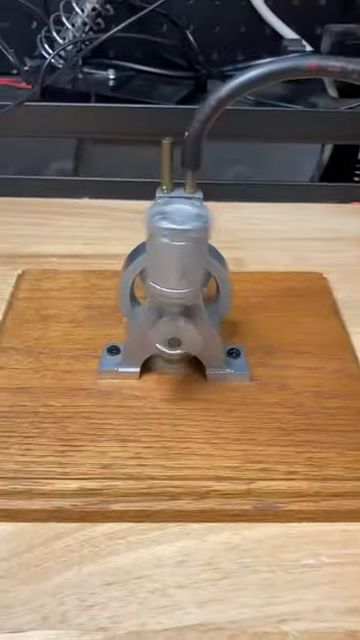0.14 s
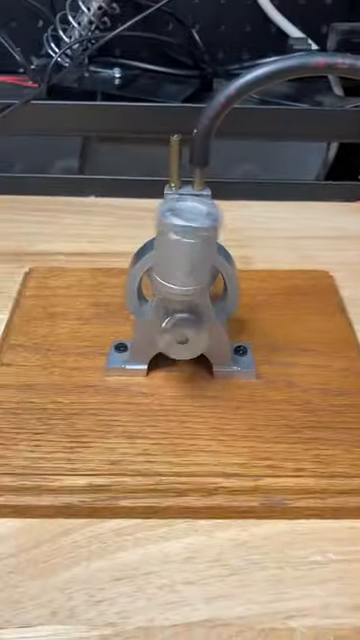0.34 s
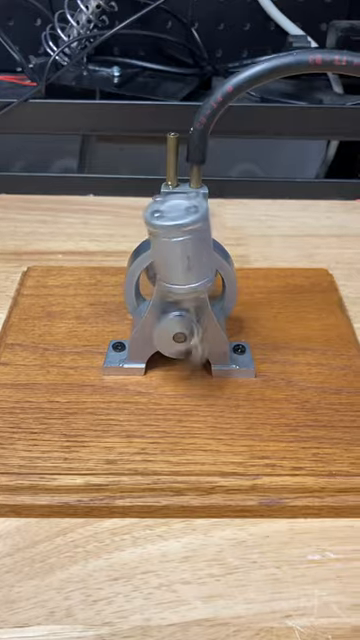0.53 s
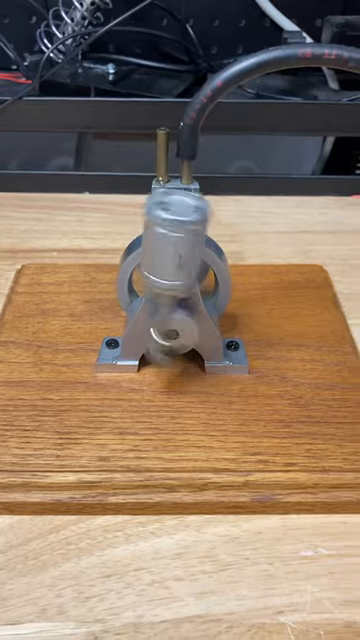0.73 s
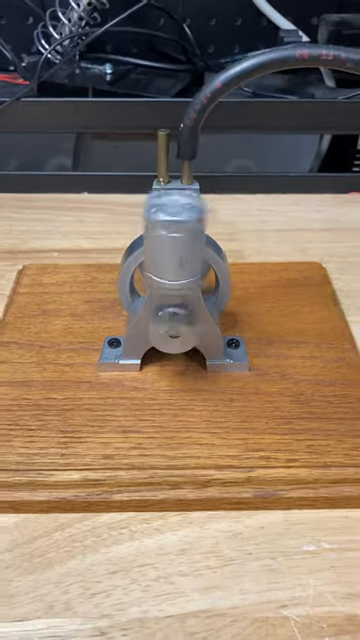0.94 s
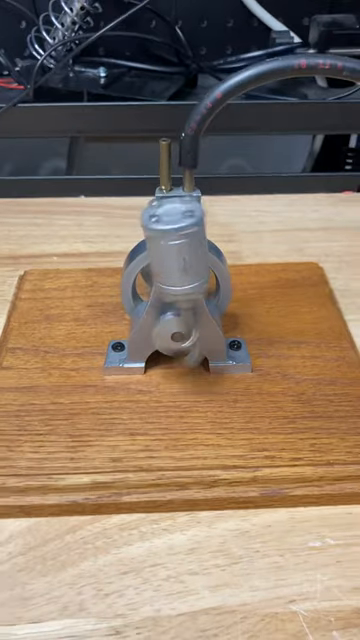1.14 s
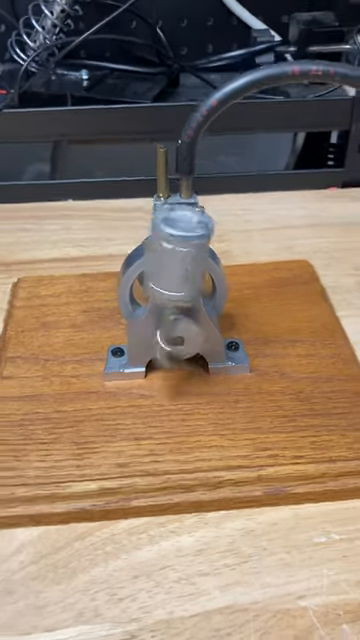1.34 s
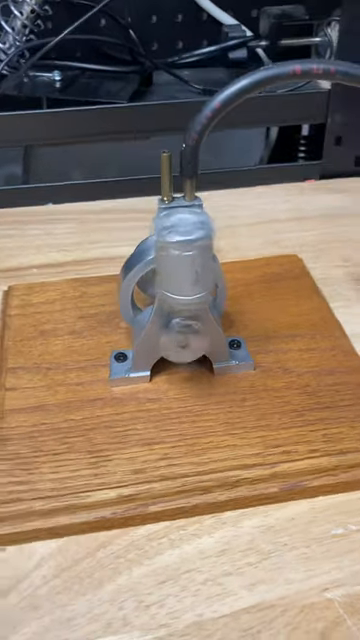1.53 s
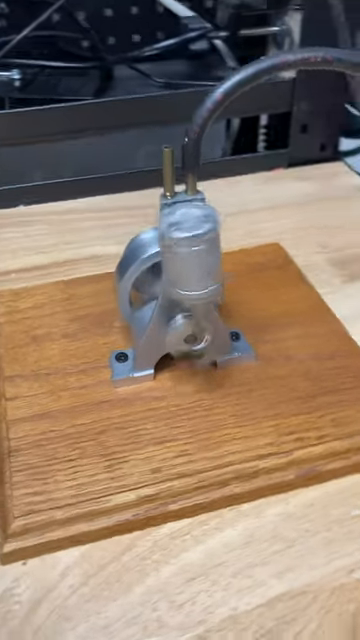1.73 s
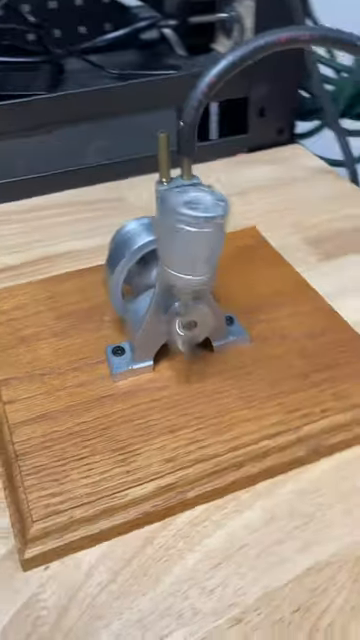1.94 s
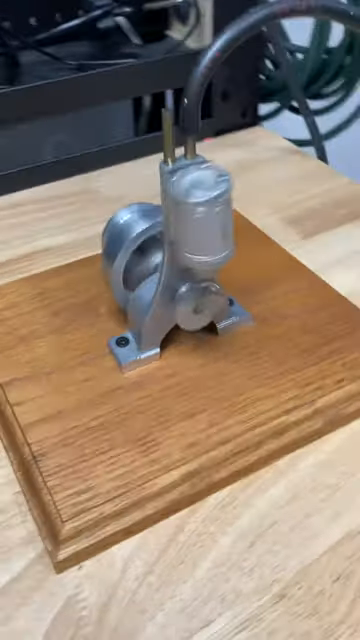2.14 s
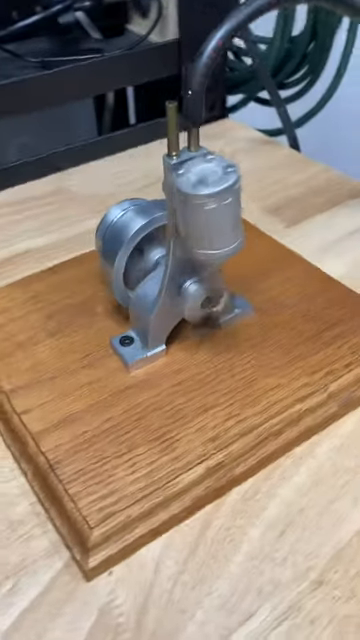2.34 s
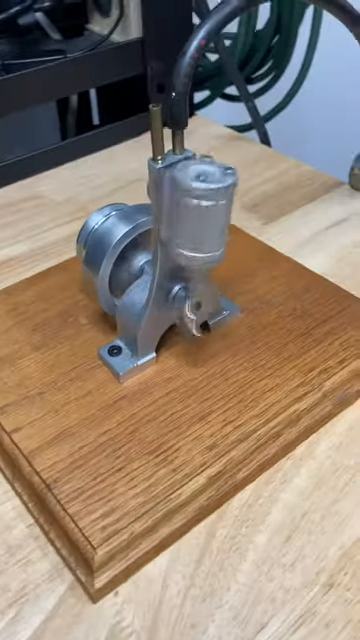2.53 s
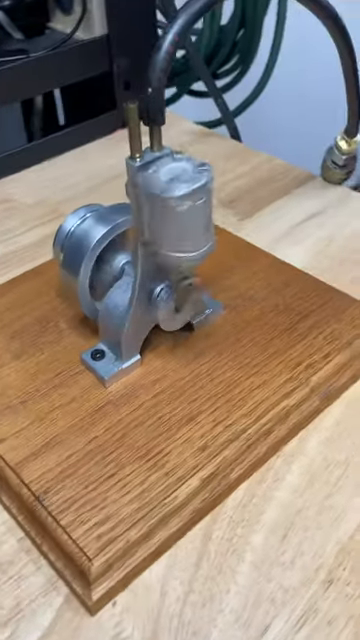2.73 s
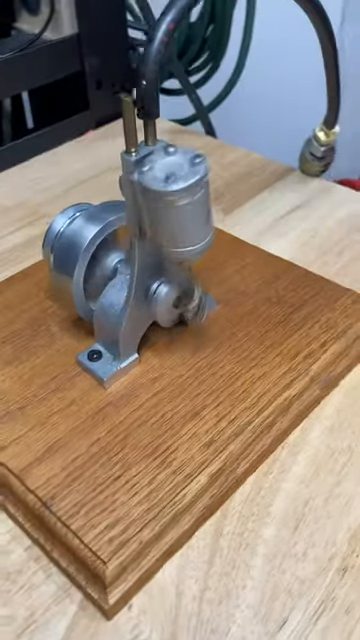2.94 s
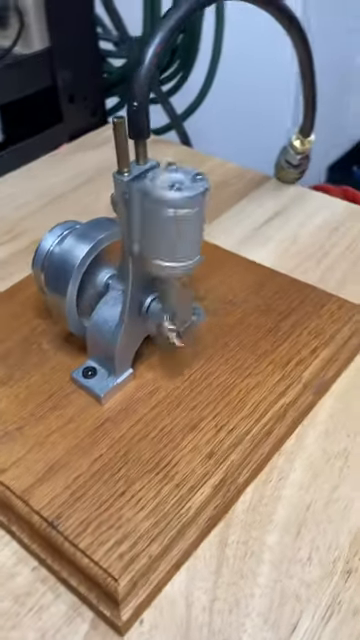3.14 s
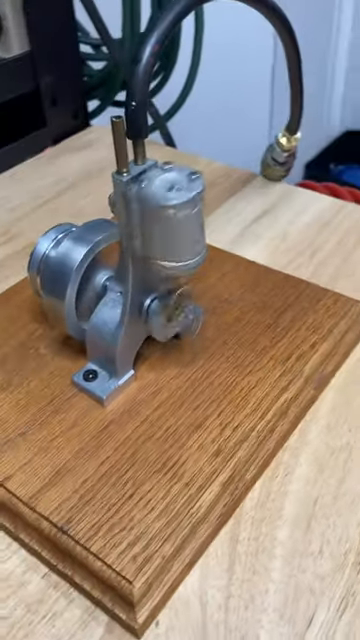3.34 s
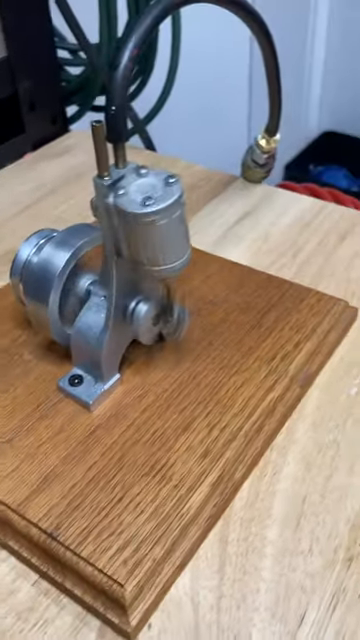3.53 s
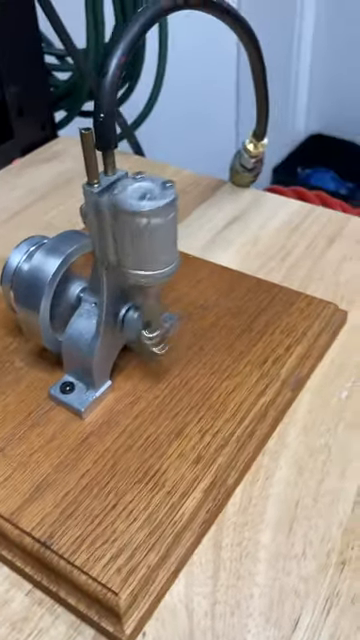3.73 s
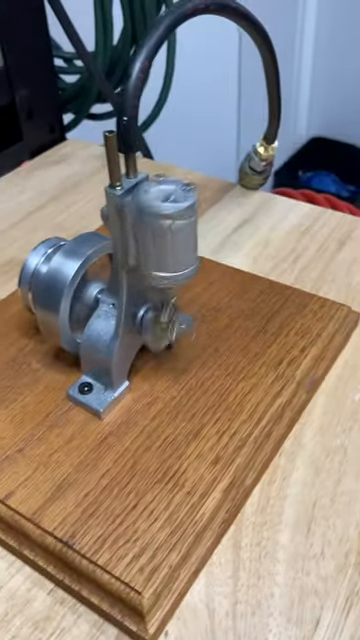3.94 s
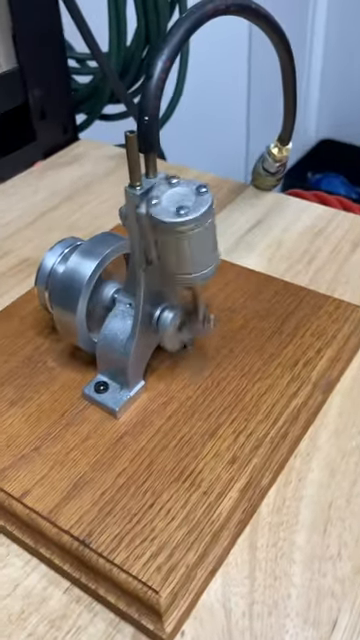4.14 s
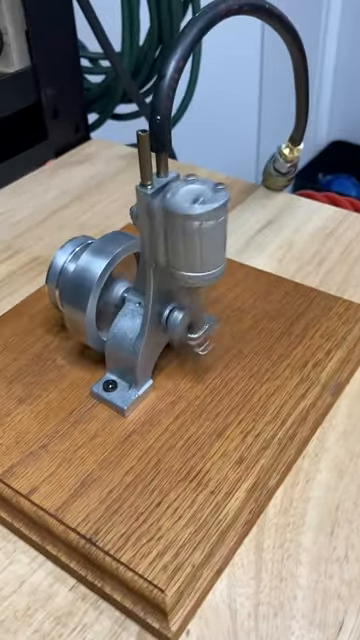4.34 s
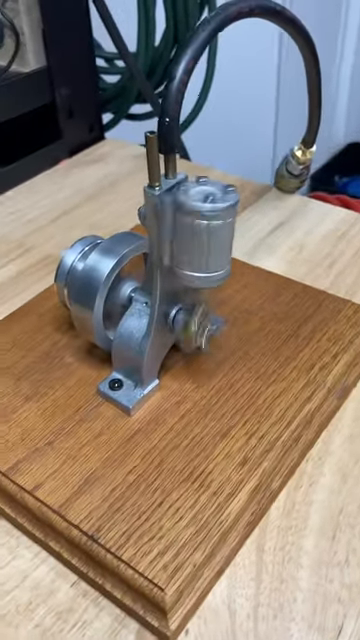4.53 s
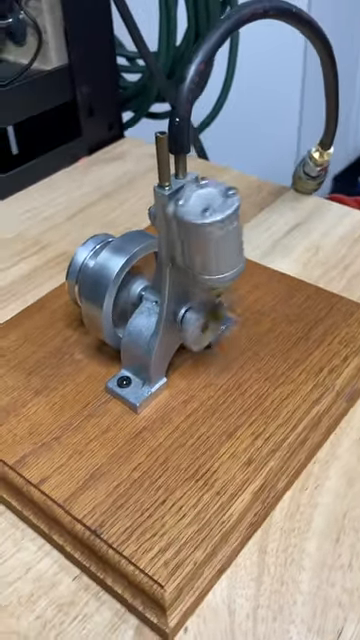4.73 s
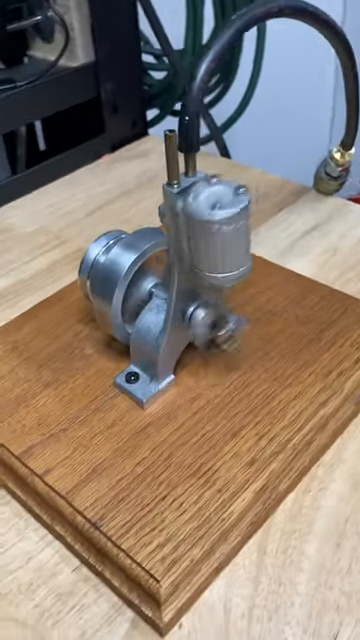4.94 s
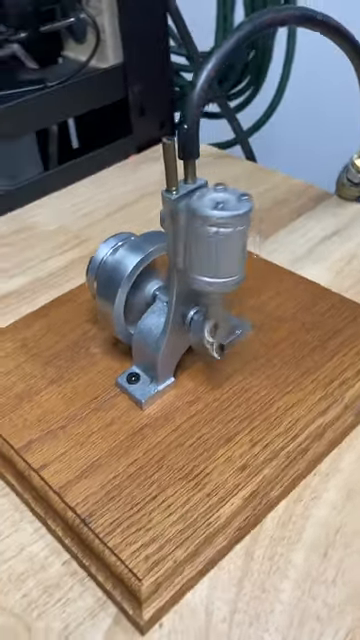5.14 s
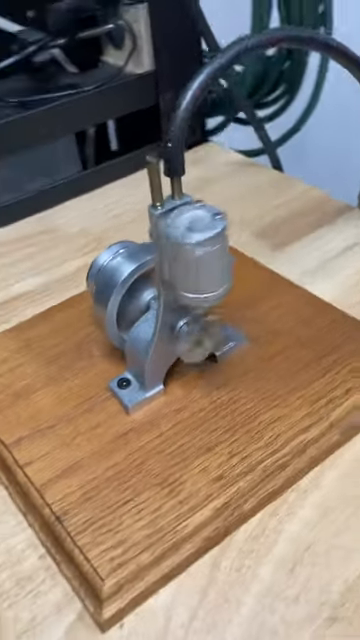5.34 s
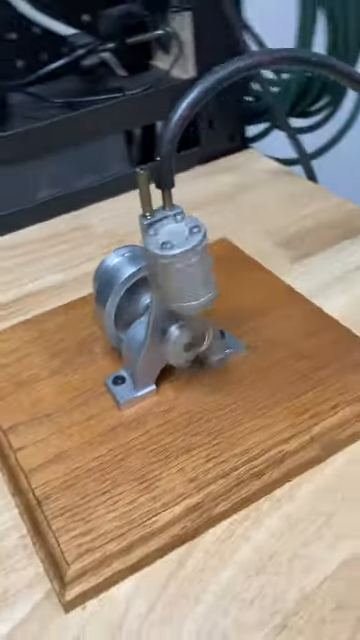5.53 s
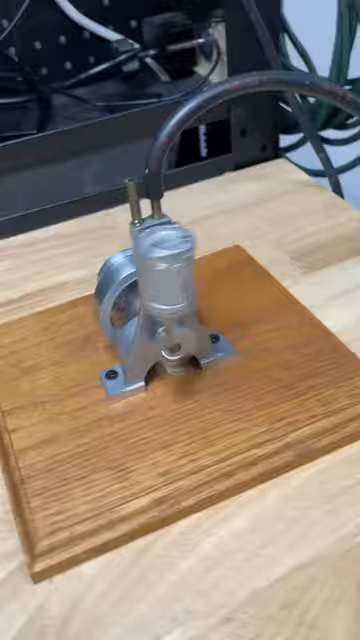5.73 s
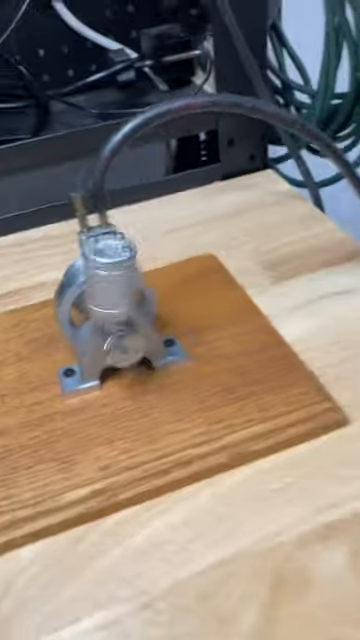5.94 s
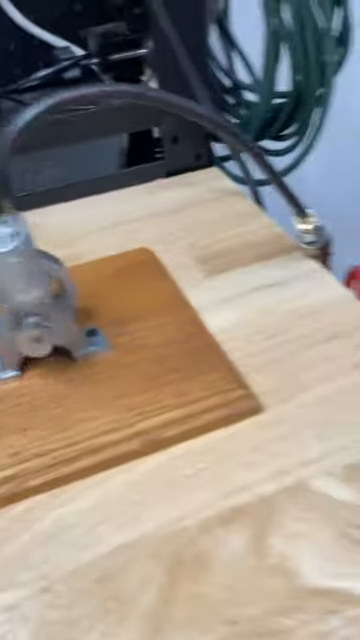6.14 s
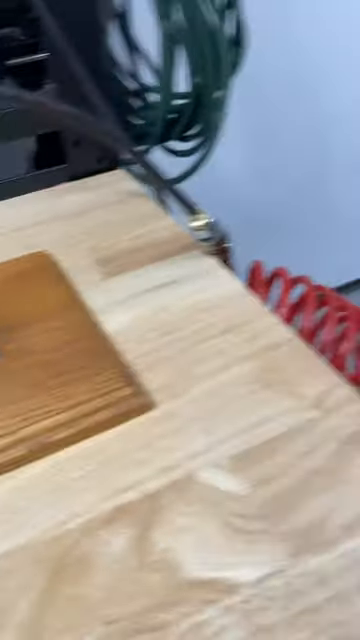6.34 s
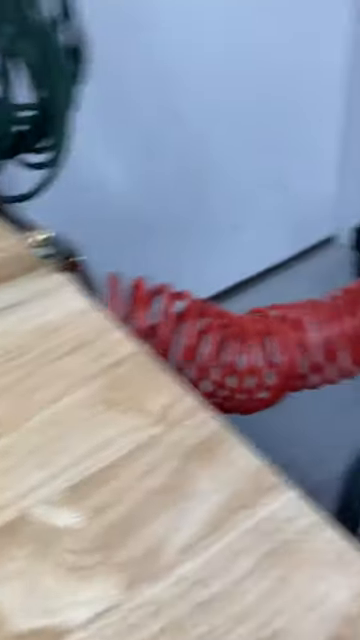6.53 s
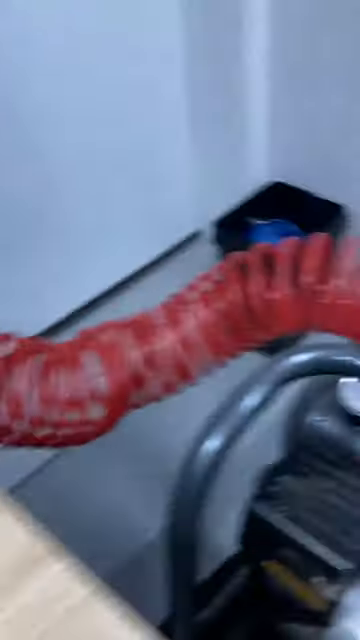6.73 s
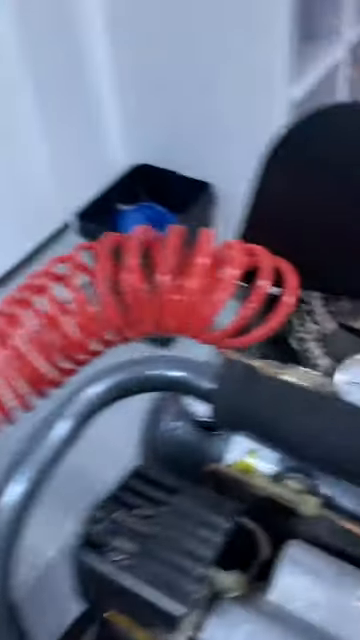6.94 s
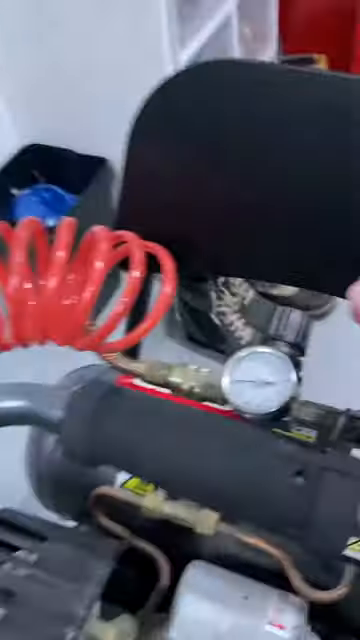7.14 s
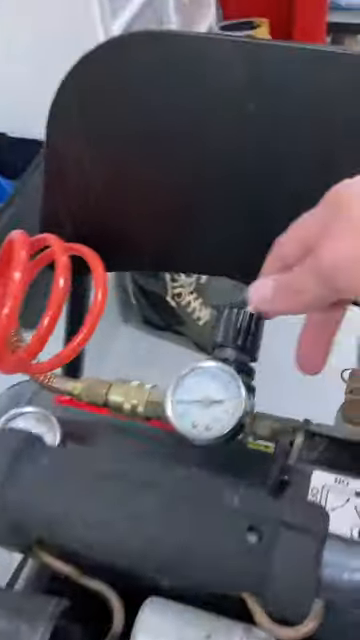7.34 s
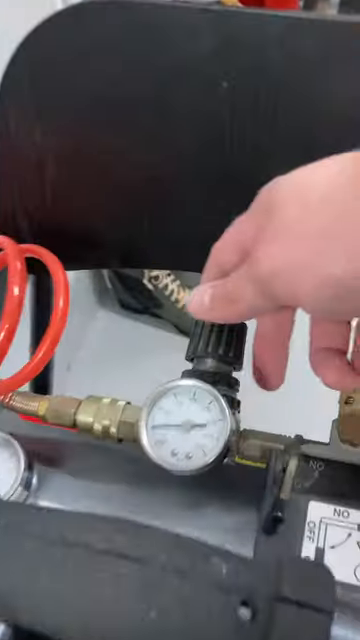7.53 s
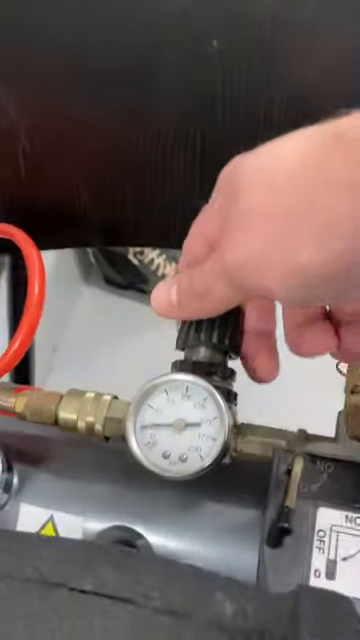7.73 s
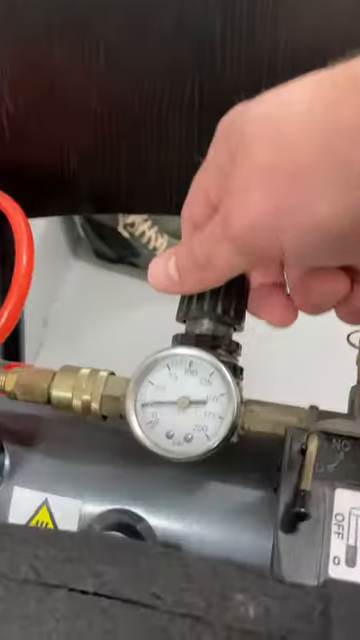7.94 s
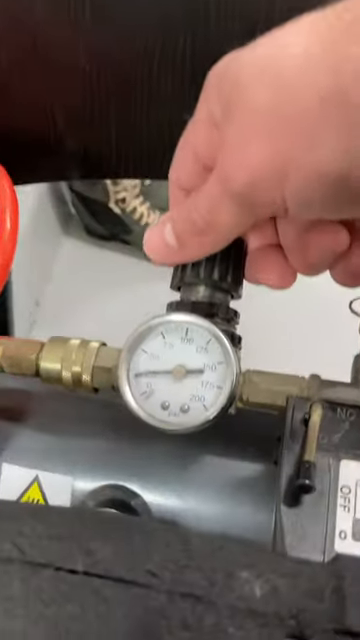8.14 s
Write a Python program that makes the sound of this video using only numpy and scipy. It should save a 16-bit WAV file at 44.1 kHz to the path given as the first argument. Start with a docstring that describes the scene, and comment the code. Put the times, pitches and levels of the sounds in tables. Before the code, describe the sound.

Rapid bright air puffs with metallic ticks blur into a raspy buzz above a faint wooden hum, fading sharply as the listener turns away.

```python
"""Workshop, a wooden board on a bench: a small oscillating-cylinder engine is already running on compressed air.
From the front come two exhaust chuffs a turn, as bursts of jet noise with metal ticks, over steady leaking air.
Crank and piston knocks ring board and bench as decaying modes, with a hum at multiples of the turning speed.
From 1.5 s the hand-held camera with its two microphone ports moves round to the side; from 5 s it leaves.
By 6.9 s it has turned away to the air tank: air and chuffs are weaker and the room weighs more."""
import sys
import numpy as np
from scipy import signal
from scipy.fft import rfft, irfft
from scipy.io import wavfile
from scipy.ndimage import uniform_filter1d

SR = 44100
rng = np.random.default_rng(int(sys.argv[2]) if len(sys.argv) > 2 else 0)


def to_wav(sig):
    """Store sig (one row per channel, or 1-D mono) as 16-bit WAV at the path in sys.argv[1].

    Samples outside -1..1 are clipped; the rate is SR.
    """
    pcm = np.clip(np.atleast_2d(sig), -1, 1) * 32767
    pcm = np.round(pcm).astype(np.int16)
    wavfile.write(sys.argv[1], SR, pcm.T)  # frames by channels


N = 360297
TIME = np.arange(N) / SR  # s
HZ = np.fft.rfftfreq(N, 1 / SR)


def gain_of(db):
    """Decibels to amplitude."""
    return 10 ** (np.asarray(db) / 20)


def evened(x):
    """Scales to rms 1."""
    return x / np.sqrt(np.mean(x ** 2) + 1e-20)


def over_time(points):
    """A table of (time_s, value) at every sample."""
    return np.interp(TIME, *np.transpose(points))


def over_frequency(points):
    """A table of (freq_hz, value) at every frequency bin, interpolated on a near-logarithmic axis."""
    freq_hz, value = np.transpose(points)
    return np.interp(np.log(HZ + 50), np.log(freq_hz + 50), value)


def noise(colour):
    """Two unrelated noises of one colour and overall rms 1, as spectra."""
    spectra = rfft(rng.standard_normal((2, N))) * gain_of(over_frequency(colour))
    return spectra / np.sqrt(np.mean(irfft(spectra, N) ** 2))


def flutter(size):
    """Random wobble of rms 1 that changes within about size samples."""
    return evened(uniform_filter1d(uniform_filter1d(rng.standard_normal(N), size), size))


# Camera positions: time_s, viewpoint (0 front, 1 side, 2 leaving, 3 afar)
CAMERA_VIEW = [(0, 0), (1.5, 0), (2.1, .5), (2.8, 1), (5, 1), (5.6, 2), (6.3, 2), (6.9, 3), (8.17, 3)]


def viewpoint():
    """Where the camera stands, 0-3, at every sample."""
    return over_time(CAMERA_VIEW)


def afar():
    """0 until the camera is leaving, rising to 1 at the far viewpoint."""
    return np.clip(viewpoint() - 2, 0, 1)


def blend(values):
    """Fades between the values of the four viewpoints as the camera moves."""
    return sum(np.maximum(1 - abs(viewpoint() - view), 0) * value for view, value in enumerate(values))


# Levels along the camera path: time_s, leak_db, bench_change_db, usual_chuff_db
CAMERA_LEVELS = [(0, -28.5, 0.9, -18), (1, -29, 0.9, -19), (1.7, -29, 0.6, -19), (2.3, -28.5, 0.8, -18),
                 (3, -28.5, -0.1, -18), (4, -29.5, -0.2, -18), (5, -28.5, 0.5, -18), (5.5, -29, 2, -18),
                 (6, -29.5, -0.7, -19.5), (6.4, -31, 0.1, -21), (6.7, -33.5, 2, -23.5),
                 (6.9, -38.5, 1, -29.5), (7.1, -38.5, -0.5, -29.5), (7.5, -38.5, -0.7, -32),
                 (8.17, -39, -2.5, -32.5)]


def camera_level(column):
    """One level along the camera path at every sample."""
    return over_time([(row[0], row[column]) for row in CAMERA_LEVELS])


# Rotation of the crank: time_s, angle_turns
CRANK_ANGLE = [(0.0, -0.197), (0.3, 3.763), (1.0, 13.007), (2.0, 26.299), (3.0, 39.659), (4.0, 53.086),
               (4.7, 62.532), (5.5, 73.361), (6.7, 89.602), (7.0, 93.659), (7.5, 100.464), (7.9, 105.902),
               (8.17, 109.568)]


def crank_turns():
    """Crank angle at every sample, smoothed so that the speed changes gently."""
    s, angle = np.transpose(CRANK_ANGLE)
    speed = np.diff(angle) / np.diff(s)
    # one more second at either end, at the nearest speed
    s = np.r_[-1, s, s[-1] + 1]
    angle = np.r_[angle[0] - speed[0], angle, angle[-1] + speed[-1]]
    return uniform_filter1d(np.interp(np.arange(-SR, N + SR) / SR, s, angle), size=8001)[SR:-SR]


# How much earlier knocks and hum come as the camera leaves: time_s, advance_turns
BENCH_ADVANCE = [(6.3, 0), (7, .015), (8.17, .04)]


def bench_angle(angle):
    """Crank angle that times the hum and all but the lowest knocks."""
    return angle + over_time(BENCH_ADVANCE)


def workshop(sound):
    """Sparse room reflections of random sign that die away by 60 dB in 0.09 s."""
    taps = np.zeros((2, SR // 2))
    slots = np.arange(200, SR // 2 - 20, 20)
    at = slots + rng.integers(0, 20, (2, len(slots)))
    np.put_along_axis(taps, at, rng.choice([-1., 1.], at.shape), 1)
    taps *= gain_of(-60 * np.arange(SR // 2) / SR / 0.09)
    return signal.fftconvolve(sound, taps / np.linalg.norm(taps[0]), axes=1)[:, :N]


# Colour of the loose bench rattle: freq_hz, density_db (per Hz, relative)
RATTLE_COLOUR = [(24, -42), (40, -52), (119, -46), (238, -1), (303, -5.5), (527, -1.5), (841, -0.5),
                 (982, 4.5), (1110, -37), (1570, -26), (2500, -50), (3250, -45), (5500, -120)]
# Rattle at the front, side, leaving and far viewpoints: level_db
RATTLE_LEVEL = [-53, -56.5, -56, -57.5]


def bench_rattle():
    """Loose rattle of the bench as steady coloured noise."""
    level_db = np.interp(viewpoint(), range(4), RATTLE_LEVEL)
    return gain_of(level_db) * irfft(noise(RATTLE_COLOUR), N)


# Shaft orders: multiple of the turning speed
SHAFT_ORDERS = [24, 40, 43, 48, 51, 55, 58, 63, 67, 68, 69, 73, 85, 41, 72, 9, 10, 20, 14, 17]
# One row an order: front_db, side_db, leaving_db, afar_db (rms)
SHAFT_ORDER_LEVELS = [(-69, -98.0, -62, -72), (-51, -88.5, -71, -65), (-60.5, -57.5, -62.0, -58.5),
                      (-84, -84, -52.5, -87), (-93.5, -59.5, -97.5, -88.5), (-55, -86.5, -58, -69),
                      (-63, -91.5, -56.5, -61.5), (-59, -55.0, -69, -65.5), (-60, -61, -58.5, -58),
                      (-68, -63.0, -68, -55), (-91.0, -84, -100.5, -62), (-57.5, -95.5, -70, -73),
                      (-94, -93, -103.5, -65), (-96, -53.5, -60, -58.5), (-62.5, -82.5, -63, -93.0),
                      (-54, -48, -58.5, -54.5), (-48, -43.5, -47.5, -58.5), (-63, -67, -65, -98.0),
                      (-82.5, -93, -94.0, -101.0), (-96, -99, -101.0, -89)]


def shaft_hum(angle):
    """Slowly wavering tones at whole multiples of the turning speed, a quarter cycle apart in the two channels."""
    out = np.zeros((2, N))
    turned = bench_angle(angle) - 0.6  # the orders line up here in the turn
    quarter = np.array([[0], [np.pi / 2]])
    for order, view_dbs in zip(SHAFT_ORDERS, SHAFT_ORDER_LEVELS):
        level = blend(gain_of(view_dbs)) * gain_of(0.5 * flutter(size=9000))
        out += np.sqrt(2) * level * np.cos(2 * np.pi * order * turned + quarter)
    return out


# Knocks within each turn: angle_turns
KNOCK_ANGLES = [.04, .107, .206, .284, .4, .507, .593, .642, .707, .78, .856, .935]
# Board and bench modes: freq_hz, t60_s, front_db, side_db, leaving_db, afar_db
BOARD_MODES = [(58.8, 0.14, -1.5, -8.5, -3.5, -7.5), (88, 0.06, -43, -25, -30, -46),
               (125.85, 0.31, -3.0, -3.0, -7.5, -18), (143.4, 0.086, -50, -46.0, -33.0, -23.5),
               (189.8, 0.5, -24, -22.5, -31, -68.5), (230, 0.39, -18, -33, -48.0, -25.5),
               (271, 0.15, -23.0, -15.5, -12.5, -68.0), (294.5, 0.18, -43, -17, -26, -25),
               (346.4, 0.21, -29, -13, -17.5, -30), (393.8, 0.15, -34, -20.5, -21, -52),
               (442.7, 0.076, -17.5, -16, -19, -55), (468, 0.15, -39, -17, -19, -22.5),
               (532, 0.14, -27, -15.5, -21, -34), (544.5, 0.088, -33.5, -29, -24, -36),
               (578, 0.1, -9.5, -22, -34, -24), (650.0, 0.15, -18, -16, -9.5, -24.5),
               (698, 0.043, -7.5, -16.5, -15.5, -27), (772.0, 0.099, -50.5, -36, -36, -38),
               (823, 0.11, -51, -22.5, -37, -37), (912.0, 0.06, -48, -50, -23, -27),
               (973, 0.07, -53.0, -35, -58.0, -64.5), (1123, 0.06, -31, -46, -30, -23)]
# Borders between the seven mode groups: freq_hz
GROUP_BORDERS = [110, 160, 400, 500, 620, 880]
# Four viewpoints (front to afar), one row a knock: level_db in each of the seven groups, low to high
KNOCK_LEVELS = [
    [(-10.0, -13.0, -1.5, -10.0, -28.0, -9.0, -14.5), (-8.5, -9.5, -37.0, -7.0, -3.5, -29.0, -31.5),
     (-12.0, -10.5, -9.5, 2.5, -2.0, -18.0, -21.0), (-21.0, -14.5, -30.0, -33.0, -6.0, -11.0, -4.0),
     (-18.0, -12.5, -5.5, -36.5, -21.5, -38.5, -34.0), (-16.5, -5.5, -12.5, -32.5, -20.0, -10.5, -10.5),
     (-28.5, -19.0, -37.0, -33.5, -11.5, -3.5, -19.5), (-10.0, -17.5, -35.0, 7.5, -27.5, -5.5, -12.0),
     (-22.5, -7.0, -32.5, -35.0, -37.0, -43.0, -11.0), (-12.5, -7.0, 1.5, 3.5, -10.5, -12.5, -24.0),
     (-14.5, -35.0, 4.5, 9.5, -1.5, -27.0, -34.5), (-9.0, -37.0, -20.5, -35.0, -2.0, -20.0, -17.5)],
    [(-18.5, -20.0, -6.5, -4.0, -5.5, -4.5, -17.0), (-10.5, -4.0, -1.5, -20.5, -14.0, -11.0, -27.0),
     (-22.5, -6.5, -11.5, -8.0, -16.0, -13.0, -17.5), (-16.5, -10.5, -6.5, -18.5, -14.0, -10.0, -29.0),
     (-19.5, -16.0, -19.5, -11.0, -36.0, -39.5, -6.5), (-13.5, -3.5, -33.5, -3.5, -31.0, -12.5, -25.5),
     (-27.5, -16.0, -35.0, -17.0, -0.5, -31.5, -25.0), (-6.0, -26.0, -5.5, -34.0, -15.0, -5.5, -25.0),
     (-14.5, -7.0, -30.5, -10.0, -15.0, -15.5, -16.5), (-7.5, -12.5, -7.5, -8.5, -10.5, -11.5, -27.5),
     (-8.0, -31.0, -2.0, -36.0, -10.5, -12.5, 6.0), (-7.5, -31.5, -21.0, -3.0, -12.5, -13.5, -27.0)],
    [(-28.5, -33.5, -2.0, -3.0, -17.5, -17.5, -20.0), (-7.0, -1.5, -22.0, -11.5, -6.5, -14.0, -1.5),
     (-7.5, -11.5, -10.5, -3.5, -24.0, -4.5, -16.5), (-6.5, -21.0, -14.5, -15.0, -14.5, -7.0, -8.0),
     (-5.5, -3.0, -33.5, -12.0, -35.5, -24.5, -35.0), (-6.0, -4.5, -8.5, -38.5, -30.5, -12.5, -24.0),
     (-15.5, -17.0, -44.0, -37.0, -1.5, -9.5, -28.5), (-11.5, -11.5, -7.5, 3.0, -1.0, -9.0, -33.0),
     (-26.5, 1.5, -37.0, -34.5, -29.5, -46.0, -34.0), (-23.5, -6.5, -13.0, -2.0, -6.0, -20.0, -9.5),
     (-25.0, -37.5, -4.5, 1.5, -11.5, -5.0, -8.5), (-19.5, -26.0, -16.0, -33.0, -2.0, -20.0, -2.0)],
    [(-25.5, -38.0, -42.0, -27.0, -5.5, -4.5, 1.0), (-17.0, -6.0, -14.0, -34.0, -10.5, -38.5, -21.5),
     (-21.5, -12.5, -16.0, -4.5, -26.5, -13.5, -28.5), (-13.5, -35.0, -29.0, -15.5, -3.0, -2.5, -14.5),
     (-8.0, -4.5, -42.5, -25.5, -35.0, -9.5, -31.0), (-9.5, -9.5, -37.5, -7.5, -4.5, -12.0, -30.0),
     (-19.0, -9.0, -41.0, -36.0, -35.0, -34.5, -33.5), (-14.5, 1.5, -26.5, 2.5, -9.5, 7.0, -34.0),
     (-26.0, 0.0, -16.5, -33.0, -16.0, -22.5, -2.0), (-10.0, -8.0, 3.5, -12.0, -4.5, -33.0, -26.5),
     (-14.0, -33.0, -43.5, 7.0, -34.0, -24.5, -13.0), (-17.0, -27.0, 1.5, -31.0, -17.0, -31.0, -0.0)],
]
# Unevenness of the blows from turn to turn, one value a group: spread_db
KNOCK_UNEVENNESS = [.05, .1, .3, .6, .6, .5, .5]
# All knocks at the front, side, leaving and far viewpoints: level_db
KNOCK_VIEW_LEVELS = [-46, -42, -45, -42]


def board_knocks(angle):
    """The same knocks return every turn, a little uneven, and ring the wood; a second point hears a quarter cycle apart."""
    advanced = bench_angle(angle)
    whole = np.arange(-9, int(angle[-1]) + 1)
    late, loud = rng.standard_normal((len(whole), len(KNOCK_ANGLES), 2)).T
    knock_turns = whole + np.array(KNOCK_ANGLES)[:, None] + .0003 * late
    contact = np.hanning(24)  # a blow lasts half a millisecond
    t = np.arange(SR // 2) / SR
    hz, t60, *view_dbs = np.array(BOARD_MODES).T[:, :, None]
    same_energy = np.sqrt(np.log(1000) / t60)  # energy alike for every decay
    modes = gain_of(-60 * t / t60) * np.exp(2j * np.pi * hz * t) * same_energy
    mode_group = np.searchsorted(GROUP_BORDERS, hz[:, 0])
    lead = SR // 2  # samples; the engine already runs before the start
    out = np.zeros((4, 2, N))
    for group, uneven_db in enumerate(KNOCK_UNEVENNESS):
        crank = advanced if group else angle
        crank = np.r_[crank[0] + (crank[1] - crank[0]) * np.arange(-lead, 0), crank]
        at = np.searchsorted(crank, knock_turns)
        inside = (at > 0) & (at < len(crank))
        own = mode_group == group
        for view, table in enumerate(KNOCK_LEVELS):
            blows = np.zeros(len(crank))
            blows[at[inside]] = gain_of(np.array(table)[:, group, None] + uneven_db * loud)[inside]
            ring = (gain_of(KNOCK_VIEW_LEVELS[view] + view_dbs[view]) * modes)[own].sum(0)
            points = np.array([ring.imag, ring.real])
            out[view] += signal.oaconvolve(blows[None], points, axes=1)[:, lead:lead + N]
    return signal.oaconvolve(blend(out), contact[None] / contact.sum(), axes=1)[:, :N]


# Bench-top echo, mostly lifting a band: time_s, freq_hz, change_db
ECHO_LIFT = [(0, 760, -3), (1.5, 910, 1.5), (2.2, 800, 4.5), (2.6, 710, 1.5), (5, 640, 4.5), (5.6, 735, 3),
             (6, 870, 4.5), (6.25, 915, 6), (6.45, 666, 3), (6.65, 650, 4), (6.85, 735, 5.5), (7.1, 874, 6),
             (7.5, 620, 3), (8.17, 563, 2)]
# Bench-top echo, cancelling a band: time_s, freq_hz, change_db
ECHO_CANCEL = [(0, 624, -1.5), (1.9, 895, -1), (2.2, 930, -12), (3, 850, -5), (4, 850, -35), (5, 845, -22),
               (5.5, 860, -9), (6, 630, 0), (6.3, 756, -9), (6.6, 860, -20), (6.85, 820, -7),
               (7.1, 515, -1), (7.5, 454, -4), (8.17, 407, -12)]


def bench_echo(pair, curve, width_hz):
    """Bench-top echo raises or lowers one band that glides as the camera moves."""
    s, hz, db = np.transpose(curve)
    turn = np.exp(2j * np.pi * np.cumsum(np.interp(TIME, s, hz)) / SR)
    r = np.exp(-np.pi * width_hz / SR)
    # shift the band to zero frequency, smooth it, shift it back
    band = 2 * (turn * signal.lfilter([1 - r], [1, -r], pair / turn)).real
    return pair + (gain_of(np.interp(TIME, s, db)) - 1) * band


# Colour of the leaking air: freq_hz, density_db (per Hz, relative)
LEAK_COLOUR = [(900, -11.5), (1300, -12), (2000, -12), (2900, -17.5), (3700, -8), (5200, -11), (6500, -2.5),
               (8000, -2), (9400, -1), (10300, 2), (12600, -11.5), (14000, 0), (16000, 2.5)]
# Ports beginning to open: angle_turns, width_turns, leak_rise_db
PORT_OPENINGS = [(.25, 0.014, 2), (.43, 0.064, 1.5), (.75, 0.02, 5.5), (.93, 0.02, 3)]


def air_leak(angle):
    """Air seeps past the port face all the time as noise, more as a port begins to open."""
    swell_db = 0
    for opening, width, rise_db in PORT_OPENINGS:
        from_opening = (angle - opening + .5) % 1 - .5
        swell_db = swell_db + rise_db * np.exp(-.5 * (from_opening / width) ** 2)
    wobble_db = 1.2 * flutter(size=200)
    air = noise(LEAK_COLOUR)
    low_gain = gain_of(6 * afar())  # from afar the part below 2230 Hz gains 6 dB
    air = irfft(air, N) + (low_gain - 1) * irfft(air * (HZ < 2230), N)
    return gain_of(camera_level(1) + swell_db + wobble_db) * air


# The two exhaust strokes of a turn: angle_turns, level_db, length_factor
EXHAUST_STROKES = [(0.488, -0.5, 1.0), (0.979, -0.4, 0.86)]
# Chuffs set one by one: time_s, level_db, treble_share_db, length_factor
SINGLE_CHUFFS = [(0.09, -17.5, 10, 0.65), (0.316, -17.5, 10, 0.5), (0.391, -17, 15, 0.57),
                 (0.581, -17, 5, 1.1), (0.848, -19.5, 7, 1.6), (1.036, -17, 7, 0.93),
                 (1.072, -17, 11, 0.62), (1.112, -18, 11, 0.94), (1.223, -18.5, 11, 1),
                 (1.488, -19.5, 5.5, 1.3), (1.526, -16, 12, 0.55), (1.64, -19, 17, 0.64),
                 (1.864, -20, 16, 1.3), (2.052, -19, 10, 1.2), (2.35, -19, 16, 0.79),
                 (2.575, -16.5, 6.5, 0.69), (2.911, -17, 12.5, 1.3), (3.063, -18, 12, 0.96),
                 (3.286, -15, 10.5, 0.84), (3.321, -17, 6, 0.8), (3.36, -14, 8, 0.5), (3.397, -20, 13, 1.1),
                 (3.733, -17, 8, 0.74), (3.805, -17, 9, 1), (3.843, -17, 13, 0.64), (3.993, -16.5, 7, 0.88),
                 (4.215, -18.5, 11, 0.93), (4.253, -18.5, 15, 0.89), (4.476, -15, 9, 0.68),
                 (4.51, -16.5, 6, 0.81), (4.585, -13, 8, 0.59), (4.659, -16, 8.5, 0.76),
                 (4.697, -14.5, 8, 0.9), (4.771, -19, 15, 1.2), (5.028, -16.5, 6, 0.78),
                 (5.066, -17, 8.5, 1.3), (5.176, -15.5, 11, 0.56), (5.213, -19, 10, 0.98),
                 (5.288, -18, 11, 0.9), (5.361, -17, 18, 0.76), (5.472, -17, 18, 0.61),
                 (5.805, -17.5, 14, 0.57), (5.841, -19, 12, 0.92), (5.915, -20, 16, 0.7),
                 (6.174, -20, 13, 0.75), (6.359, -19.5, 7, 0.81), (6.617, -24.5, 18, 0.93),
                 (6.652, -20.5, 11, 0.55), (6.766, -24, 5, 0.94), (6.838, -25.5, 8, 1.4),
                 (6.912, -27.5, 13, 1.2)]


def chuff_list(angle):
    """Rows (time_s, level_db, treble_share_db, length_factor), two a turn; some are set one by one."""
    far = afar()
    port, stroke_db, length = np.tile(np.transpose(EXHAUST_STROKES), int(angle[-1]) + 2)
    late, loud, bright, long = rng.standard_normal((len(port), 4)).T
    # turns: from afar the chuffs come earlier by 0.012; each wanders a little
    due = np.arange(len(port)) // 2 - 1 + port + 0.0038 * late
    at = np.searchsorted(angle + 0.012 * far, due)
    inside = (at > 0) & (at < N)
    at = np.minimum(at, N - 1)
    louder_db = 0.93 * loud
    level_db = camera_level(3)[at] + stroke_db + louder_db
    treble_db = 10 - far[at] + 3.5 * bright
    # stronger chuffs are shorter; from afar a chuff lasts 4.9 % longer
    length = length * (1 + 0.049 * far[at]) * np.exp(0.14 * long - 0.414 * louder_db)
    rows = np.transpose([at / SR, level_db, treble_db, length])[inside]
    for single in SINGLE_CHUFFS:
        rows[np.argmin(abs(rows[:, 0] - single[0]))] = single
    return rows


# Modes of the cylinder on its port face: freq_hz, t60_s, level_db
CYLINDER_MODES = [(1563, 0.054, -24.5), (1919, 0.028, -20), (2235, 0.031, -24), (2590, 0.054, -26.5),
                  (2952, 0.18, -33.5), (4090, 0.033, -20), (4660, 0.04, -27)]


def cylinder_ticks(strokes):
    """The cylinder ticks on its port face at each stroke, as strong as its chuff, with its own mix of modes."""
    lag_s, spread_db, detune = .0008, 4.5, 0.0496  # detune is a share: it follows the spot that is struck
    t = np.arange(2000) / SR
    out = np.zeros((2, N + 2000))
    hz, t60, mode_db = np.array(CYLINDER_MODES).T[:, :, None]
    chance = rng.standard_normal((len(strokes), 2, len(CYLINDER_MODES), 1))
    for (s, level_db, *_), (loud, high) in zip(strokes, chance):
        tick_db = level_db + mode_db + spread_db * np.clip(loud, -2, 1.6)
        size = gain_of(tick_db - 60 * t / t60) * np.minimum(t * hz, 1)  # full after one cycle
        turn = 2 * np.pi * hz * (1 + detune * high) * t
        at = min(round((s + lag_s) * SR), N)
        out[:, at:at + len(t)] += [(size * np.sin(turn)).sum(0), (size * np.cos(turn)).sum(0)]
    return out[:, :N]


def patchy(pair, patchy_db):
    """Random narrow patches of level vary the colour of the noise bursts."""
    z = signal.stft(pair, nperseg=512, noverlap=384)[2]
    field = uniform_filter1d(rng.standard_normal(z.shape[1:]), size=4, axis=0)
    field = uniform_filter1d(field, size=8, axis=1)
    field = field - uniform_filter1d(field, size=40, axis=0)  # the colour moves, the loudness stays
    return signal.istft(z * gain_of(patchy_db * evened(field)), nperseg=512, noverlap=384)[1][:, :N]


# Colour of the exhaust jet: freq_hz, density_db (per Hz, relative)
JET_COLOUR = [(900, -90), (1300, -25), (2000, -24.5), (2900, -31.5), (3700, -16), (4300, -11.5), (5200, -7),
              (6500, -1), (7200, -8.5), (8000, -2.5), (9400, -3.5), (10300, 1), (12600, 3.5), (14000, -1.5),
              (16000, -12.5)]
# Exhaust pipe rings: freq_hz, width_hz, level_db
PIPE_RINGS = [(1780, 78, -4), (1835, 300, 5), (4106, 380, -1), (4562, 43, 7.5), (7097, 75, 7.5)]
# Layers of the jet: low_hz, high_hz, lag_s, rise_s, fall_s, treble_weight, afar_change_db
JET_LAYERS = [(800, 3300, 0.00081, 0.0053, 0.0046, -0.21, 1), (3300, 5590, 0.0011, 0.0031, 0.0046, -1, 3.5),
              (6290, 9290, 0.00027, 0.0043, 0.0042, -0.0077, 1.2),
              (9390, 29000, 0.00012, 0.0043, 0.0041, 0.51, -0.2)]
# How far each layer follows the length of its chuff: exponent
LAYER_STRETCH = [.4, 0.32, 0.83, 0.81]


def exhaust(strokes):
    """Each chuff is a burst of turbulent jet noise coloured by the pipe, in four layers from low to high."""
    # the two lower layers come later and die slightly more slowly than the two upper
    pipe = 1 + sum(gain_of(db) / (1 + (2 * (HZ - hz) / width) ** 2) for hz, width, db in PIPE_RINGS)
    air = noise(JET_COLOUR) * pipe
    before = 800  # samples kept ahead of each chuff
    u = np.arange(-before, 1600) / SR
    out = np.zeros((2, N))
    chance = rng.standard_normal((len(strokes), 2, len(JET_LAYERS)))  # delay and level vary by layer
    eddies = gain_of(0.97 * flutter(size=30))
    for layer, (lo_hz, hi_hz, lag, rise, fall, weight, far_db) in enumerate(JET_LAYERS):
        gate = np.zeros(N + len(u))
        for (s, level_db, treble_db, length), (late, loud) in zip(strokes, chance[:, :, layer]):
            v = (u - lag - .0004 * late) / length ** LAYER_STRETCH[layer]
            burst = np.where(v < 0, np.exp(-abs(v / rise) ** 1.7), 1 / np.cosh(v / fall))
            at = round(s * SR)
            burst_db = level_db + weight * (treble_db - 7.5) + 1.15 * loud
            gate[at:at + len(u)] += gain_of(burst_db) * burst
        layer_air = irfft(air * ((HZ >= lo_hz) & (HZ < hi_hz)), N)
        out += gain_of(far_db * afar()) * gate[before:][:N] * layer_air
    return eddies * out


# Phase between the microphone ports: freq_hz, left_lead_rad
MIC_PHASE = [(0, 0), (430, -.3), (690, 1), (1030, -.3), (1810, 1.5), (2070, 1.5), (2600, .1), (3190, -3.1),
             (3450, -3.1), (3750, -5.5), (4200, -5.4), (4900, -3.14), (6100, -3.14), (7000, -1.6),
             (7700, 0), (9300, 0), (10000, 1.4), (11200, 3.14), (12000, 3.14), (13500, 4.8), (14300, 6.28)]
# How alike left and right sound, by frequency: freq_hz, likeness (0-1)
STEREO_LIKENESS = [(60, 1), (130, 1), (300, 0.95), (550, 0.97), (800, 0.57), (1200, 0.4), (2500, 0.13),
                   (3300, 0.9), (4200, 0.62), (5000, 1), (6000, 1), (6800, 0.83), (8000, 0.93), (9200, 1),
                   (10200, 0.67), (11300, 1), (12000, 1), (13200, 1), (14800, 0.68)]
# Balance of the two ports: freq_hz, left_minus_right_db
MIC_BALANCE = [(60, -3.5), (140, -2.5), (330, -3.5), (500, -4), (770, -.5), (1790, -3), (2740, 0)]


def microphone_ports(pair):
    """Left hears the first sound; right hears it shifted in phase, mixed with the second."""
    first, second = rfft(pair)
    same = np.clip(over_frequency(STEREO_LIKENESS), 0, 1)
    tilt = gain_of(over_frequency(MIC_BALANCE) / 2)
    shifted = first * np.exp(-1j * over_frequency(MIC_PHASE))
    right = same * shifted + np.sqrt(1 - same ** 2) * second
    return irfft(np.array([first * tilt, right / tilt]), N)


def scene():
    """Rattle, hum, knocks, leak, ticks and exhaust with its room echo at the two ports."""
    angle = crank_turns()
    bench = gain_of(camera_level(2)) * (board_knocks(angle) + shaft_hum(angle)) + bench_rattle()
    bench = bench_echo(bench, ECHO_LIFT, width_hz=130)
    bench = bench_echo(bench, ECHO_CANCEL, width_hz=123)
    strokes = chuff_list(angle)
    jet = patchy(exhaust(strokes), patchy_db=2.4) + cylinder_ticks(strokes)
    room_db = -16.0 + 12.5 * afar()  # the room weighs more from afar
    room = gain_of(room_db) * workshop(jet)
    return microphone_ports(jet + room + air_leak(angle) + bench)


def record(dry):
    """Bass roll-off of the microphone below 37 Hz, then the band limit at 15850 Hz."""
    thin = signal.sosfilt(signal.butter(8, 37, "high", fs=SR, output="sos"), dry)
    band_limit = signal.firwin(511, 15850, window=("kaiser", 9), fs=SR)
    return signal.oaconvolve(thin, band_limit[None], "same")


dry = scene()
out = record(dry)
to_wav(out)
```